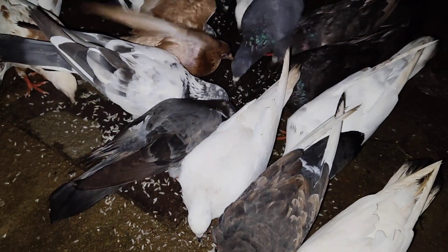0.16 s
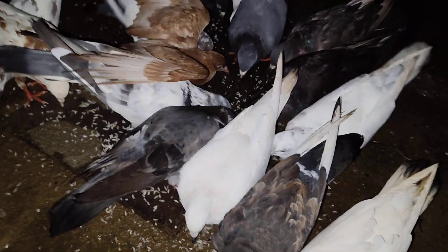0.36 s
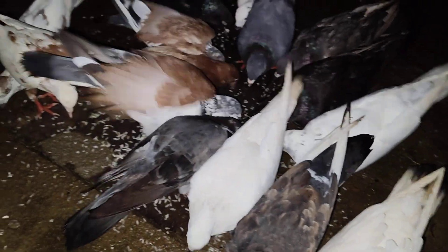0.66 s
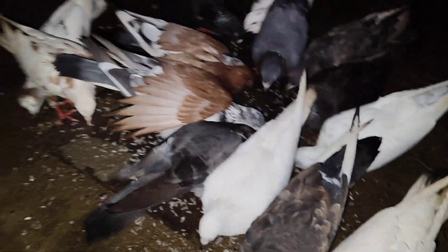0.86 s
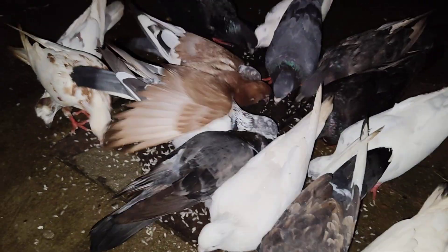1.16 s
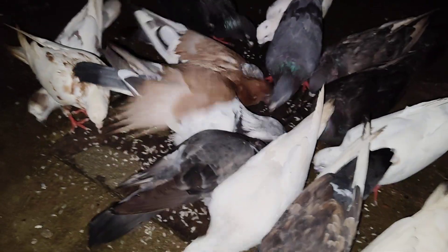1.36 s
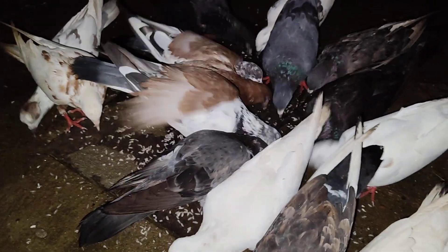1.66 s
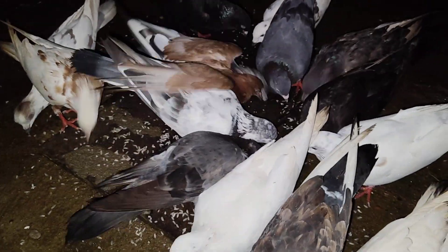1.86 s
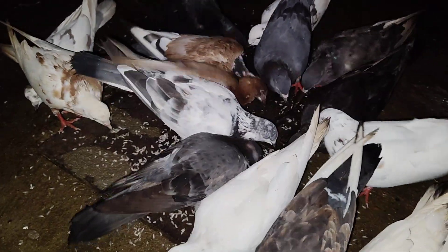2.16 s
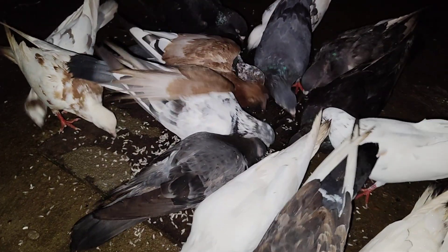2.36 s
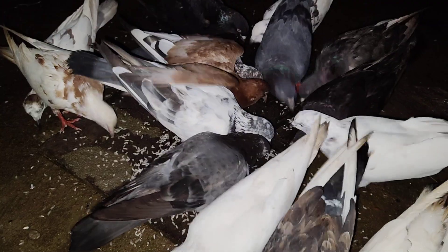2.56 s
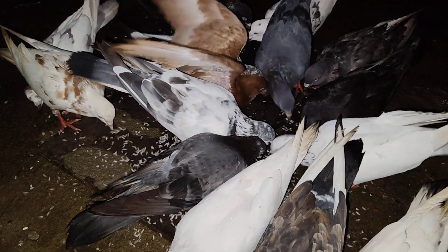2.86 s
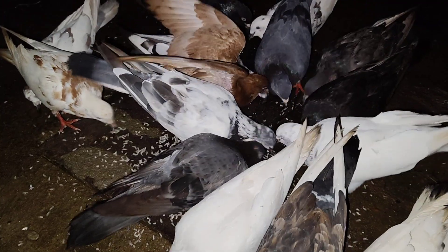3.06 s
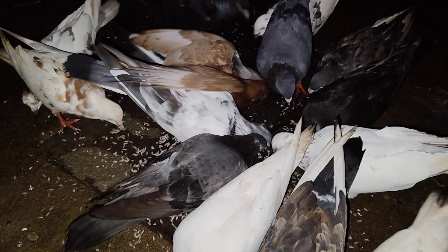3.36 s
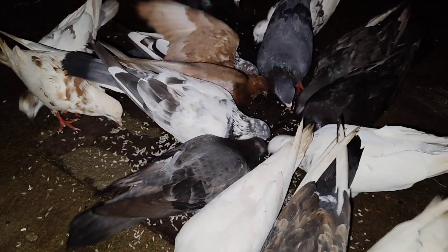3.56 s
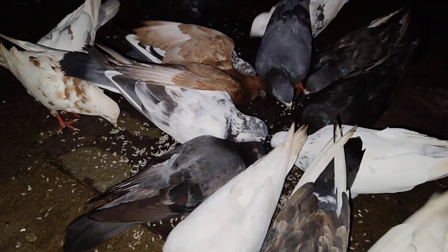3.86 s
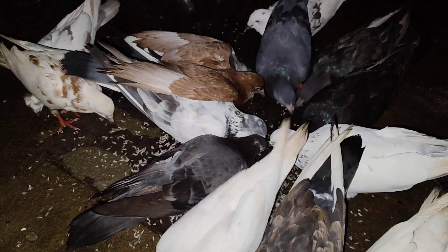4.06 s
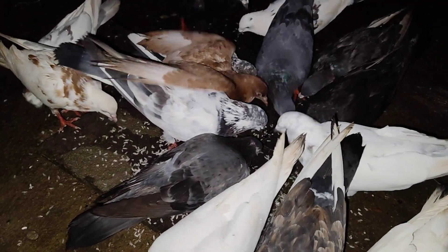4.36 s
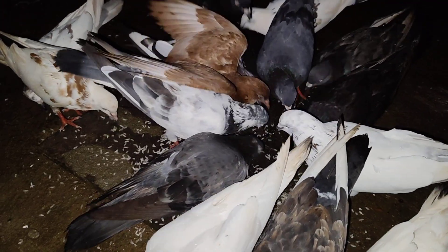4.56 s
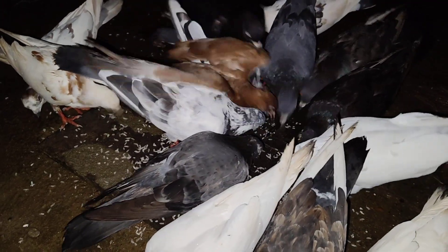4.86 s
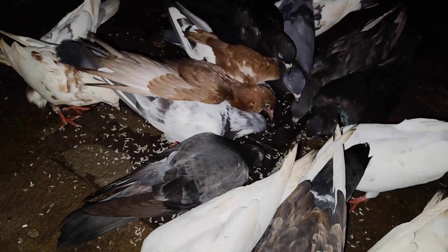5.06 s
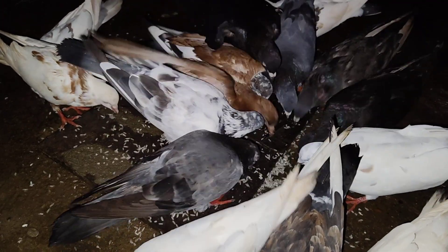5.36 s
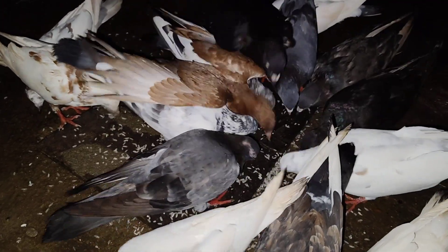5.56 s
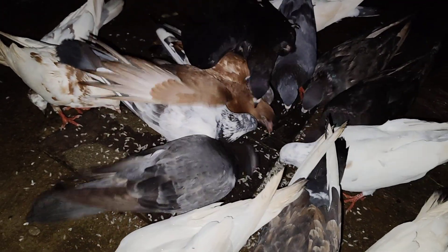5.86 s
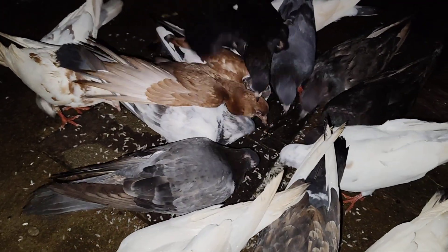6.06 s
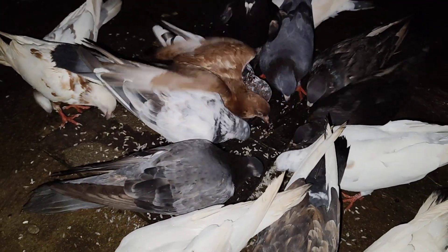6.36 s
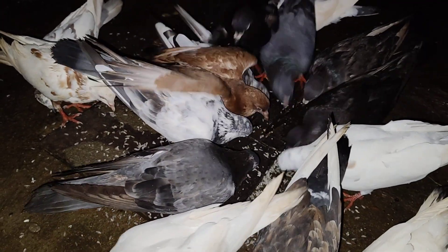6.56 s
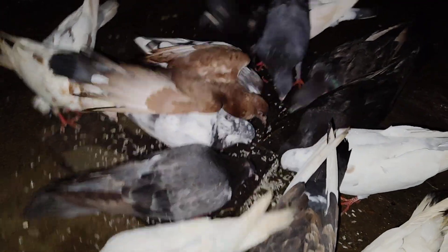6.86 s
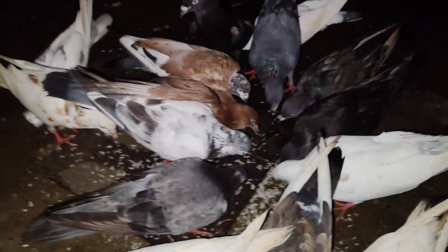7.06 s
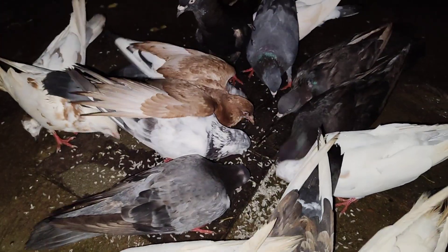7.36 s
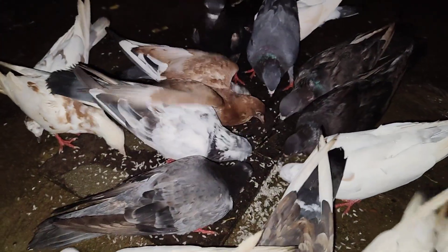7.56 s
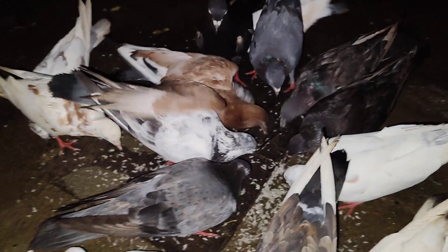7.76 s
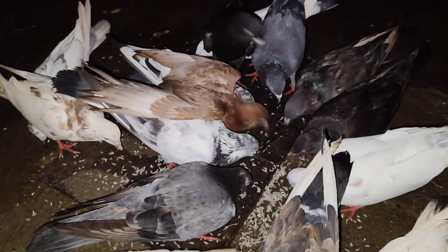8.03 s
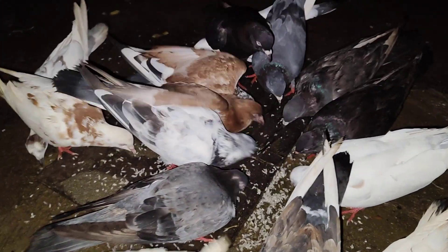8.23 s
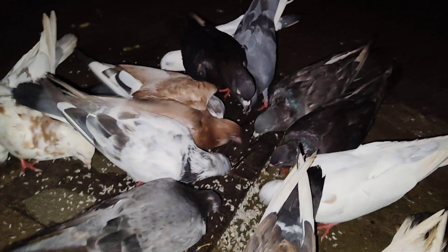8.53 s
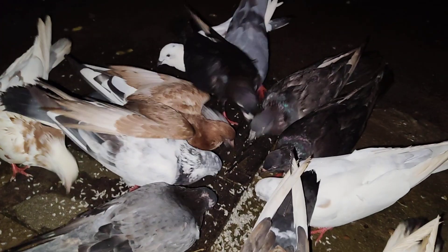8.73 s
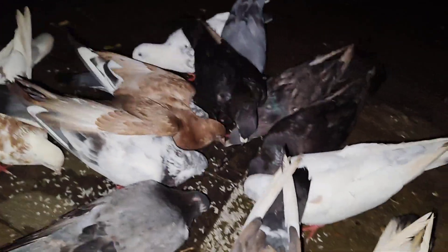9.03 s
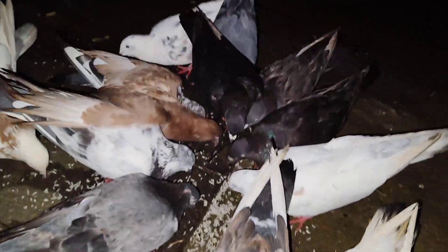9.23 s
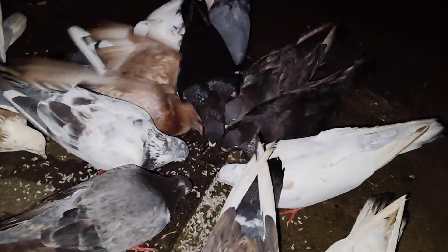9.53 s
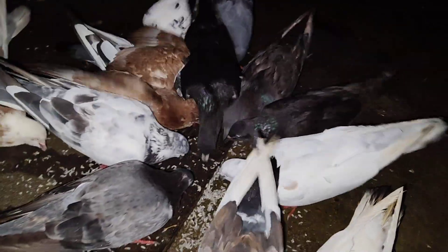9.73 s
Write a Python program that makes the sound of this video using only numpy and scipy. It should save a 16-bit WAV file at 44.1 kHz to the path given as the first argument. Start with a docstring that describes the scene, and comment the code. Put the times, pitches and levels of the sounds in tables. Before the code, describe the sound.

Pigeons peck grain from a hard floor close by, making small, irregular, hollow taps throughout, mixed with light husk ticks and feather rustles. A quiet, steady hum of night insects lies behind them, and one faint cricket trills about once a second. From about 0.4 seconds, soft wing beats push low puffs of air onto the left side of the microphone, strongest around 1 to 1.7 seconds and again from 6 to 7 seconds. From 0.6 seconds a young bird begs in thin, high, wavering whistles, often two pitches at once, with faint hoarse wheezes. The begging peaks near 3 seconds in a squeal with hissy edges, then returns in short calls roughly every second from 4 to 8 seconds. The hardest peck lands near 6.9 seconds, and the tapping continues until the end, at about 10 seconds.

```python
"""Pigeons crowd over grain at night. From the start, beaks knock on the floor in short ringing blows, and a
near wall's quick echo lends them a few evenly spaced pitches; husks tick and feathers brush, in front of the
steady noise bands of an insect chorus. From 0.4 s wing beats puff air on the left microphone port. From 0.6 s a
young bird begs in thin two-voiced whistles and hoarse wheezes, and one cricket trills about every 0.9 s. The
begging peaks near 3 s in a squeal with hissy edges; the hardest peck falls near 6.9 s, and the feeding goes on
to the end."""
import sys
import numpy as np
from scipy import signal
from scipy.fft import rfft, irfft
from scipy.io import wavfile

SR = 44100
rng = np.random.default_rng(int(sys.argv[2]) if len(sys.argv) > 2 else 0)


def log_audio(samples):
    """Write samples as a 16-bit WAV file to the path given in sys.argv[1]."""
    # one column per channel
    frames = np.atleast_2d(samples).T
    # limit to full scale, then quantise
    limited = np.clip(frames, -1, 1)
    pcm = np.round(limited * 32767).astype(np.int16)
    wavfile.write(sys.argv[1], SR, pcm)


N = 436149


def from_db(db):
    """Amplitude ratio of a level in decibels."""
    return 10 ** (np.asarray(db) / 20)


def rms_one(x):
    """Normalisation to unit rms."""
    return x / np.sqrt(np.mean(x ** 2) + 1e-20)


def peak_one(x):
    """Normalisation to unit peak."""
    return x / np.abs(x).max()


def at_hz(points, hz):
    """Interpolation of (frequency, value) points on a logarithmic frequency axis."""
    point_hz, values = np.transpose(points)
    return np.interp(np.log(hz), np.log(point_hz), values)


def stretch(rows):
    """Linear interpolation of timed rows: first sample, tapered window, each column sample by sample."""
    times, *columns = np.transpose(rows)
    at = np.arange(round(times[0] * SR), min(round(times[-1] * SR), N))
    window = signal.windows.tukey(len(at), min(1, 0.014 * SR / len(at)))
    return at[0], window, [np.interp(at / SR, times, column) for column in columns]


def drift(corner_hz):
    """Random modulation of unit rms: noise through a double one-pole low-pass."""
    pole = np.exp(-40 * np.pi * corner_hz / SR)      # runs at SR / 20
    slow = signal.lfilter([1], [1, -2 * pole, pole * pole], rng.standard_normal(N // 20 + 2002))[2000:]
    return np.interp(np.arange(N) / 20, np.arange(len(slow)), rms_one(slow))


def band(x, low_hz, high_hz, order=3):
    """Maximally flat band-pass filter."""
    return signal.sosfilt(signal.butter(order, [low_hz, high_hz], "band", fs=SR, output="sos"), x)


def add(out, start, sound, pan_db, lag):
    """Direction from level and time differences: pan is left minus right; the right lags in samples."""
    for side, shift in enumerate((0, round(lag))):
        part = sound[:max(0, N - start - shift)]
        out[side, start + shift:start + shift + len(part)] += part * from_db(pan_db * (0.25 - side))


def peck(spot_hz, crunch_db):
    """Ringing impact: a blow sounds most the ringing pitches near the struck spot's pitch; grain crunches."""
    # ringing pitches of a knock: (frequency [Hz], relative level [dB], 60 dB decay time [s])
    ringing_tones = [(583.4, -1.5, 0.064), (760, 2, 0.045), (950, 8, 0.021), (1170, 2.5, 0.016),
                     (1258, 4, 0.014), (2297, 11, 0.014)]
    loss_db_per_octave, contact_s, damping_spread = 12, .0006, .12
    hz, level_db, t60 = np.transpose(ringing_tones)[:, :, None]
    t = np.arange(2300) / SR
    chance = rng.standard_normal(2 * len(hz))
    mode_db = level_db - loss_db_per_octave * np.abs(np.log2(hz / spot_hz))
    mode_db += 3.5 * np.clip(chance[:len(hz), None], -1.5, 1.5)
    detune = 1 + 0.032 * chance[len(hz):, None]
    decay_db = -60 * t / (t60 * np.exp(damping_spread * chance[1]))
    rings = np.sum(from_db(mode_db + decay_db) * np.sin(2 * np.pi * hz * detune * t), axis=0)
    knock = band(rings * (1 - np.exp(-t / contact_s)) ** 2, 480, 2600)      # little bass leaves the floor
    crunch_envelope = from_db(-60 * t / 0.02) * (1 - np.exp(-t / 0.0038))
    crunch = band(rng.standard_normal(len(t)) * crunch_envelope, 830, 2680)
    blow = peak_one(knock) + from_db(crunch_db) * peak_one(crunch)
    # a lighter, brighter second contact as the beak closes and lifts
    lag = round((.024 + .003 * np.clip(chance[0], -2, 2)) * SR)
    second_db = -16 + 5 * np.clip(chance[-1], -2, 1.8)
    blow[lag:] += from_db(second_db) * band(blow, 700, 2600, order=1)[:-lag]
    return blow


def pecks():
    """Superposition of impacts: clear pecks, and faint ones at random from the back of the flock."""
    # beak on floor: (time [s], knock level [dB], pitch of the spot [Hz], crunch re knock [dB])
    blows = [(0.014, -27.5, 1168, -16), (0.062, -44, 580, -9), (0.109, -45.5, 574, -11),
             (0.121, -40.5, 560, -11), (0.145, -33.5, 760, -22), (0.248, -37.5, 950, -16),
             (0.298, -43.5, 746, -15), (0.317, -34.5, 759, -7), (0.436, -43.5, 750, -11),
             (0.534, -42, 581, -11), (0.554, -39.5, 905, -21), (0.577, -39.5, 700, -16),
             (0.636, -61, 555, -11), (0.708, -65, 799, -11), (0.728, -34.5, 736, -10),
             (0.765, -36, 557, -6), (0.834, -43.5, 634, -11), (0.845, -35.5, 780, -7),
             (0.866, -37, 760, -15), (1.072, -42, 565, -11), (1.083, -42.5, 584, -4),
             (1.165, -34.5, 700, -23), (1.23, -48.5, 764, -11), (1.306, -43, 710, -18),
             (1.377, -39, 560, 1.5), (1.444, -45.5, 579, -9), (1.47, -31.5, 990, -14),
             (1.603, -51.5, 573, -9), (1.692, -46.5, 522, -11), (1.693, -57, 781, -11),
             (1.725, -31.5, 568, -16), (1.757, -44, 596, -15), (1.868, -40.5, 958, -16),
             (1.969, -39.5, 579, -6), (2.021, -28.5, 784, -15), (2.129, -45.5, 522, -11),
             (2.147, -31, 950, -17), (2.225, -35.5, 625, -21), (2.358, -63, 926, -11),
             (2.375, -32.5, 630, -20), (2.437, -46, 925, -19), (2.612, -44.5, 834, -15),
             (2.712, -32.5, 770, -22), (2.774, -42, 625, -3), (2.935, -54, 1300, -11),
             (3.015, -40, 950, -16), (3.141, -46.5, 786, -13), (3.327, -31.5, 950, -22),
             (3.423, -42.5, 760, -21), (3.47, -42.5, 720, -16), (3.557, -42.5, 980, -15),
             (3.672, -45.5, 930, -11), (3.725, -47, 748, -19), (3.844, -50.5, 960, -16),
             (4.025, -31.5, 780, -18), (4.069, -60, 977, -11), (4.139, -59, 902, -11),
             (4.156, -35, 700, -6), (4.17, -31.5, 980, -9), (4.527, -43, 1260, -11),
             (4.575, -32.5, 1240, -18), (4.644, -43.5, 1270, -11), (4.82, -39.5, 576, -11),
             (4.841, -31, 730, -14), (4.89, -32.5, 571, -22), (4.893, -34, 571, -6), (4.925, -34.5, 740, 4),
             (5.068, -52, 560, -11), (5.094, -37.5, 760, -17), (5.12, -40, 783, -6),
             (5.133, -34.5, 736, -9), (5.263, -47, 600, -11), (5.301, -40, 920, -9), (5.354, -51, 765, -11),
             (5.379, -35.5, 780, -6), (5.412, -26.5, 770, -12), (5.561, -38, 600, 3), (5.607, -42, 573, -6),
             (5.659, -50, 950, -13), (5.682, -44, 780, -8), (5.873, -33.5, 840, -0.5),
             (6.01, -37.5, 770, -16), (6.119, -43.5, 953, -13), (6.164, -39.5, 770, -25),
             (6.256, -38, 950, -20), (6.321, -66, 732, -11), (6.339, -41.5, 960, -11),
             (6.464, -45, 950, -9), (6.595, -37.5, 950, -7), (6.662, -54, 770, -11),
             (6.684, -31.5, 685, -0.5), (6.72, -47, 770, -11), (6.794, -41.5, 947, -2),
             (6.82, -31.5, 759, -9), (6.857, -40, 810, -11), (6.862, -16.5, 1170, -2.5),
             (6.976, -60, 760, -11), (7.015, -40, 754, -8), (7.042, -35.5, 780, -4), (7.119, -47, 760, -9),
             (7.171, -39, 750, -11), (7.444, -46, 970, -9), (7.555, -40, 565, -15), (7.591, -34, 910, -19),
             (7.667, -50, 726, -11), (7.802, -35, 760, -13), (7.874, -32.5, 950, -11),
             (7.946, -47.5, 710, -11), (7.962, -45, 748, -11), (8.031, -36.5, 939, -24),
             (8.158, -52, 571, -7), (8.221, -36.5, 730, -4), (8.393, -40.5, 810, -11),
             (8.478, -32.5, 970, -9), (8.527, -49, 720, -13), (8.541, -39, 580, -10),
             (8.585, -39.5, 794, -16), (8.615, -49, 785, -11), (8.642, -40, 1010, -15),
             (8.722, -47, 815, 3), (8.833, -53, 756, -13), (8.872, -46, 579, -17), (8.954, -37, 690, -6),
             (8.997, -35, 810, -7), (9.016, -32, 806, -17), (9.183, -44.5, 950, 1), (9.289, -35, 576, -6),
             (9.364, -31.5, 925, -12), (9.378, -30, 586, -4.5), (9.427, -33.5, 930, -2),
             (9.499, -61, 514, -11), (9.516, -43.5, 576, -8), (9.637, -39, 560, -11),
             (9.695, -47, 750, -11), (9.867, -44, 920, -11)]
    faintest_db, faint_range_db = -60.5, 16
    out = np.zeros((2, N))
    for s, level_db, spot_hz, crunch_db in blows:
        sound = from_db(level_db) * peck(spot_hz, crunch_db)
        add(out, round(s * SR), sound, pan_db=1.3 + 5.5 * rng.standard_normal(), lag=5.52)
    for when, size, spot, side in rng.random((100, 4)):
        sound = from_db(faintest_db + faint_range_db * size) * peck(550 + 600 * spot, crunch_db=-27.5)
        add(out, int(when * N), sound, pan_db=6 * (side - .5), lag=4.4)
    return out


def bright_bursts():
    """Exponentially decaying noise in three bands: husk ticks, feather brushes, a squeal's hissy edges."""
    # husks and feathers, except the four rows from 2.8 to 3.1 s: high, hissy edges of the loudest squeal
    # (time [s], narrow band's level [dB], its centre [Hz], 60 dB decay time [s],
    # low band re narrow [dB], wide band re narrow [dB])
    events = [(0.0124, -49.5, 8200, 0.037, 3.5, -15), (0.0603, -54.5, 8150, 0.044, 10, -13),
              (0.196, -55, 8470, 0.03, -10, -15), (0.3745, -56, 8100, 0.083, 13.5, -21),
              (0.5103, -59, 9950, 0.052, 3, -13), (0.6963, -57, 9710, 0.044, 6, -15),
              (0.915, -51, 8300, 0.037, -20, -12), (1.0754, -52.5, 8300, 0.029, -16, -15),
              (1.36, -56, 7960, 0.061, 4, -13), (1.375, -49, 7670, 0.071, 2, -10),
              (1.4267, -54, 7960, 0.1, -13, -1), (1.598, -52, 8000, 0.044, 0, -9),
              (1.679, -58, 10900, 0.041, -1, -11), (1.984, -52, 8400, 0.041, 3, -5),
              (2.6366, -46, 7920, 0.031, -25, -26), (2.8684, -71, 8400, 0.055, -7, -15),
              (2.9243, -54, 7700, 0.061, -12, -24), (2.9756, -72, 7750, 0.055, 5, -15),
              (3.042, -54, 8500, 0.071, -5, -8), (3.779, -56, 10100, 0.05, -14, -13),
              (4.0685, -39.5, 8200, 0.089, -3, -3.5), (4.1614, -51.5, 8900, 0.085, -7, -15),
              (4.3853, -66, 8060, 0.055, 4, -15), (4.656, -65, 8080, 0.035, 6, -17),
              (5.412, -47, 7800, 0.026, 12, -18), (5.5593, -51, 7770, 0.033, 18, -15),
              (5.7618, -49.5, 7900, 0.055, -6, -7), (5.7957, -58, 10700, 0.055, -10, -15),
              (6.062, -48, 8100, 0.034, -17, -16), (6.567, -59, 8130, 0.04, -10, -15),
              (6.5994, -55.5, 9200, 0.043, -19, -15), (6.6807, -49.5, 7890, 0.032, 13, -20),
              (6.768, -63, 8430, 0.046, 3, -15), (6.8438, -51, 8300, 0.055, 11, -19),
              (6.8613, -46.5, 8100, 0.031, 15, -17), (7.015, -49, 11050, 0.048, 2, -8),
              (7.0415, -55, 8550, 0.042, -2, -11), (7.2105, -57, 8300, 0.055, -2, -9),
              (7.3178, -64, 8040, 0.055, -15, -15), (7.4245, -67, 8390, 0.051, -15, -15),
              (7.7992, -54.5, 7700, 0.037, 5, -13), (8.0307, -50, 7800, 0.05, -3, -23),
              (8.0472, -50, 7700, 0.044, -12, -25), (8.2257, -62, 8210, 0.047, -10, -17),
              (8.4105, -56.5, 9700, 0.055, -16, -8), (8.7146, -49.5, 8000, 0.03, -5, -11),
              (8.8104, -50.5, 7900, 0.091, -17, -15), (8.8308, -38, 8400, 0.065, -9, -8),
              (8.952, -58, 8110, 0.068, 7, -13), (9.0084, -58, 8300, 0.06, 7, -15),
              (9.051, -54, 7850, 0.049, -8, -15), (9.196, -59, 8000, 0.055, 0, -20),
              (9.2603, -44.5, 8060, 0.061, -21, -21), (9.2738, -44, 8300, 0.029, -28, -19),
              (9.5105, -54.5, 7960, 0.044, 1, -13)]
    out, t = np.zeros((2, N)), np.arange(3600) / SR
    for s, level_db, hz, t60, low_db, wide_db in events:
        rise = (1 - np.exp(-t / (0.077 * t60))) ** 2      # long bursts also start slowly
        bursts = rng.standard_normal((3, len(t))) * from_db(-60 * t / t60) * rise
        narrow = peak_one(band(bursts[0], 0.967 * hz, 1.047 * hz))
        wide = peak_one(band(bursts[1], 8600, 12100, order=2))
        low = peak_one(band(bursts[2], 3000, 5020))
        add(out, round(s * SR), from_db(level_db) * narrow, pan_db=14, lag=4)
        add(out, round(s * SR), from_db(level_db + wide_db) * wide, pan_db=2, lag=4)
        add(out, round(s * SR), from_db(level_db + low_db) * low, pan_db=-7, lag=5.32)
    return out


def whistles():
    """Frequency and amplitude modulation: each begging voice is a wavering sine with a weaker octave."""
    # whistles, one row for each stretch of a voice; the loudest call runs over several rows: (pan [dB],
    # left lag [ms], octave re fundamental [dB], contour of (time [s], pitch [Hz], rms level [dB]))
    stretches = [ (5, 0.29, -27, [(0.63, 3560, -75), (0.64, 3414, -72), (0.732, 3829, -63),
                 (0.798, 3650, -61), (0.874, 3600, -61), (0.88, 3670, -61), (0.91, 3500, -73)]),
                 (-8, 0.21, -32, [(0.63, 4070, -88), (0.638, 3880, -78), (0.682, 4200, -58),
                 (0.744, 4200, -84), (0.78, 3770, -73)]), (-12, 0.19, -33, [(2.45, 4142, -95),
                 (2.48, 4080, -62), (2.55, 4450, -88), (2.562, 4050, -78), (2.57, 4007, -91)]),
                 (-7, 0.21, -32, [(2.56, 4080, -86), (2.578, 4000, -66), (2.646, 4040, -54),
                 (2.662, 4180, -60.5), (2.77, 3500, -51), (2.79, 3495, -80)]),
                 (-3.5, 0.22, -23, [(2.915, 3700, -102), (2.935, 3969, -51), (2.951, 3674, -47.5),
                 (3.0, 3970, -49), (3.01, 3900, -45), (3.016, 3850, -50), (3.048, 4186, -33),
                 (3.1, 3970, -62)]), (-4, 0.218, -10, [(3.1, 3780, -58), (3.116, 3567, -71),
                 (3.134, 3960, -53), (3.16, 3850, -48), (3.17, 3850, -50), (3.2, 4030, -44.5),
                 (3.218, 3740, -59), (3.225, 3666, -69)]), (26, 0.18, -36, [(2.855, 8530, -79),
                 (2.883, 8270, -61.5), (2.913, 7000, -91), (2.95, 5650, -70)]),
                 (1, 0.13, -28, [(2.94, 5720, -57), (2.974, 5770, -53), (2.998, 5730, -60),
                 (3.032, 5300, -52), (3.05, 4960, -39)]), (-4.5, 0.13, -12.5, [(3.04, 5240, -68),
                 (3.058, 4940, -44), (3.094, 4934, -44), (3.13, 5150, -45), (3.14, 4990, -42),
                 (3.2, 4950, -40.5), (3.216, 4400, -81), (3.225, 4470, -65)]),
                 (3, 0.22, -35, [(4.09, 3290, -70), (4.102, 3680, -59), (4.2, 3810, -57.5),
                 (4.208, 3770, -58.5), (4.362, 3920, -51), (4.378, 3860, -56), (4.386, 3860, -51.5),
                 (4.44, 3250, -64)]), (3, 0.22, -23, [(4.97, 3550, -51), (5.076, 3820, -70),
                 (5.112, 3760, -56), (5.134, 3800, -56), (5.24, 3910, -55.5), (5.268, 3560, -52.5),
                 (5.288, 3580, -55), (5.31, 3510, -51)]), (-12, 0.24, -42, [(4.98, 3980, -107),
                 (4.998, 4130, -59), (5.098, 4030, -59), (5.204, 4240, -70), (5.236, 4100, -74),
                 (5.25, 4219, -79), (5.3, 4100, -63)]), (-8, 0.26, -34, [(5.83, 3460, -60),
                 (5.904, 3955, -58.5), (5.958, 4000, -62), (6.006, 4050, -47), (6.03, 4085, -44.5),
                 (6.065, 4370, -71), (6.084, 4110, -45), (6.182, 4000, -44), (6.208, 3580, -57),
                 (6.24, 3550, -51)]), (-9.5, 0.217, -34, [(6.89, 3706, -78), (6.922, 3904, -60),
                 (6.986, 4040, -62.5), (7.018, 3915, -51), (7.118, 4140, -47.5), (7.132, 3950, -46),
                 (7.16, 3660, -55.5), (7.2, 3210, -59)]), (-27, 0.14, -34, [(7.03, 4540, -88),
                 (7.044, 4530, -72), (7.166, 4600, -79), (7.178, 4513, -80), (7.19, 4669, -88)]),
                 (3, .22, -26, [(7.73, 3306, -71), (7.768, 3390, -57), (7.856, 3707, -54),
                 (7.916, 3674, -52), (7.95, 3860, -53), (7.958, 3776, -52), (8.05, 3910, -49),
                 (8.12, 3490, -52)]), (-9, 0.2, -40, [(7.76, 3870, -76), (7.78, 3940, -56),
                 (7.928, 3943, -62), (7.99, 3970, -50.5), (8.016, 3980, -61), (8.036, 4110, -52),
                 (8.092, 4100, -59), (8.12, 4023, -84)]), (-16, 0.23, -40, [(8.96, 4130, -86),
                 (8.976, 4394, -94), (9.174, 5060, -77), (9.23, 5016, -80.5), (9.27, 5290, -70),
                 (9.386, 5260, -80), (9.42, 5330, -101)]), ]
    waver_depth, flutter_db, rasp_depth = .006, 1.6, .1
    out = np.zeros((2, N))
    waver, flutter, rasp = drift(45), drift(70), drift(350)
    for pan_db, lag_ms, octave_db, contour in stretches:
        start, window, (hz, level_db) = stretch(contour)
        here = slice(start, start + len(window))
        cycles = np.cumsum(hz * (1 + waver_depth * waver[here])) / SR
        phase = 2 * np.pi * (cycles - hz * lag_ms / 1000 * np.array([[1], [0]]))
        tone = (np.sin(phase) + from_db(octave_db) * np.sin(2 * phase)) * (1 + rasp_depth * rasp[here])
        gain = from_db(level_db + flutter_db * flutter[here] + pan_db * np.array([[.5], [-.5]]))
        out[:, here] += np.sqrt(2) * window * gain * tone
    return out


def wheezes():
    """Narrow-band noise: the bird's hiss, centred on its throat resonance, swells fast, fades slowly."""
    # hoarse breaths: (time [s], duration [s], level [dB], throat resonance [Hz])
    breaths = [(0.718, 0.18, -73, 4170), (1.29, 0.34, -69, 4430), (3.044, 0.043, -50, 5000),
               (3.8, 0.35, -83, 4430), (6.238, 0.24, -76, 4360), (8.42, 0.27, -75, 4460)]
    rise_share, edge_db = 0.29, -11.5
    out, roughness = np.zeros((2, N)), drift(260)
    for s, length, level_db, hz in breaths:
        swell = [(s, edge_db), (s + length * rise_share, 0), (s + length, edge_db)]
        start, window, (swell_db,) = stretch(swell)
        carrier = np.sin(2 * np.pi * hz * np.arange(len(window)) / SR)
        hiss = band(window * roughness[start:start + len(window)] * carrier, 2710, 5900)
        add(out, start, from_db(level_db + swell_db) * hiss, pan_db=-27.5, lag=6.7)
    return out


def puffs():
    """Wind noise: turbulence and single pressure swings push the membrane, mostly at the left port."""
    # gusts of stirred air: (centre time [s], level [dB], bell half width [s])
    gusts = [(0.548, -41, 0.054), (0.76, -69, 0.24), (0.97, -28, 0.024), (1.2, -52, 0.36),
             (1.457, -27, 0.034), (1.676, -27, 0.063), (2.022, -40.5, 0.054), (2.181, -40.5, 0.012),
             (2.306, -46, 0.046), (3.762, -42, 0.023), (4.93, -66, 0.075), (5.212, -52, .025),
             (5.356, -64, .015), (5.547, -52, 0.064), (5.73, -42, 0.02), (5.84, -54, 0.018),
             (6.041, -28, 0.043), (6.19, -30.5, 0.024), (6.29, -39.5, .07), (6.573, -34, 0.044),
             (6.712, -39, 0.029), (6.938, -36, 0.066), (7.118, -38.5, 0.058), (7.33, -48, 0.086),
             (7.491, -40, 0.02), (8.01, -38.5, 0.048), (8.7, -50, 0.017), (8.92, -51, 0.02)]
    # puffs that push the membrane once in and out: (time [s], level [dB], frequency [Hz])
    pushes = [(0.485, -32, 42.8), (0.756, -43.5, 70.6), (0.951, -33, 49.5), (1.194, -49, 40.4),
              (1.428, -26, 65.3), (1.595, -33, 67.7), (1.701, -21.5, 77), (1.976, -44, 75),
              (2.264, -47.5, 59.5), (3.716, -38.5, 39), (5.183, -53, 43.1), (5.994, -33, 59.6),
              (6.072, -24, 62.5), (6.16, -23.5, 69), (6.502, -42, 74.4), (6.874, -42, 56.5),
              (6.923, -28.5, 53), (7.371, -43, 54.3), (7.992, -39, 40.6), (8.667, -55, 40)]
    calm_db, right_port_db = -70.5, -44.5
    t = np.arange(N) / SR
    swells = sum(from_db(level_db) * np.exp(-.5 * ((t - s) / half) ** 2) for s, level_db, half in gusts)
    turbulence = rms_one(band(rng.standard_normal((2, N + SR)), 24.1, 61.8)[:, SR:])
    port_db = 2 * drift(14) + np.array([[0], [right_port_db]])
    out = turbulence * (from_db(calm_db) + swells) * from_db(port_db)
    for s, level_db, hz in pushes:
        cycles = (np.arange(3000) / SR - .022) * hz
        swing = -np.sin(2 * np.pi * cycles) * np.exp(-(cycles / 0.4) ** 2)
        add(out, round((s - .008) * SR), from_db(level_db) * swing, pan_db=30.5, lag=0)
    return out


def flaps():
    """Air displacement: each wing beat is a dull, exponentially decaying burst of low noise."""
    # wing beats: (time [s], level [dB], 60 dB decay time [s], pan [dB])
    beats = [(0.421, -62, 0.047, -19), (0.497, -60, 0.59, -6), (0.645, -48, 0.015, -16.5),
             (0.739, -56, 0.058, -10), (1.303, -54, 0.084, 3), (1.478, -50, 0.046, 4),
             (1.709, -55, 0.12, 28), (3.843, -55, 0.019, 2), (5.126, -57.5, 0.052, -6),
             (5.761, -51, 0.097, 2.5), (6.854, -46, 0.031, -4), (7.033, -45, 0.046, -23.5),
             (7.081, -59.5, 0.089, -22.5), (7.817, -58.5, 0.092, -4), (7.988, -66, 0.05, -24),
             (8.45, -62, 0.31, -14), (8.531, -50.5, 0.11, -15), (8.618, -58, 0.049, -12),
             (9.399, -58.5, 0.23, -10), (9.461, -49, 0.11, 2)]
    out, t = np.zeros((2, N)), np.arange(6000) / SR
    for s, level_db, t60, pan_db in beats:
        envelope = from_db(-60 * t / max(t60, .02)) * (1 - np.exp(-t / 0.0031)) ** 2
        burst = band(rng.standard_normal(len(t)) * envelope, 55, 306)
        add(out, round(s * SR), from_db(level_db) * peak_one(burst), pan_db, lag=3)
    return out


def crackle():
    """A clustered random process: scattering grain and rustling feathers make narrow-band scratches."""
    # scratch bands: (centre [Hz], pan [dB])
    bands = [(4700, -11.5), (7900, 27), (8500, 19), (9800, 14.5), (11200, -4)]
    out = np.zeros((2, N))
    onsets = rng.random(N) < 70 * from_db(7 * drift(4)) / SR      # the rate wanders around 70 a second
    sizes = from_db(3 * np.minimum(rng.exponential(1, N), 3))
    band_index = rng.integers(0, len(bands), N)
    noise = rng.standard_normal(N)
    for k, (hz, pan_db) in enumerate(bands):
        envelope = signal.fftconvolve(sizes * onsets * (band_index == k), np.hanning(1200))[:N]
        add(out, 0, from_db(-71) * band(noise * envelope, 0.907 * hz, 1.057 * hz), pan_db, lag=5.9)
    return out


def cricket():
    """Stridulation: each trill is a few evenly spaced pulses of one tone."""
    # trills: (time [s], pulses [count], level [dB])
    trills = [(.62, 7, -67), (1.488, 11, -60.5), (2.428, 7, -61.5), (3.344, 9, -62), (4.248, 8, -63.5),
              (5.092, 10, -59.5), (5.989, 7, -62), (6.91, 7, -67), (7.875, 5, -66.5), (8.767, 7, -64),
              (9.71, 4, -69)]
    tone_hz, period_s, pulse_s = 7050, .0403, .018
    out, t = np.zeros((2, N)), np.arange(round(pulse_s * SR)) / SR
    pulse = np.hanning(len(t)) * np.sin(2 * np.pi * tone_hz * t)
    for s, count, level_db in trills:
        for k in range(int(count)):
            swell_db = -6 * np.exp(-k / 0.5)      # the first strokes are weaker
            start = round((s + k * period_s - pulse_s / 2) * SR)
            add(out, start, from_db(level_db + swell_db) * pulse, pan_db=-3, lag=1)
    return out


def night():
    """Incoherent summation: far insects merge into bell-shaped noise bands above the low night air."""
    # spectrum of the night air: (frequency [Hz], relative spectral level [dB])
    air = [(18, -1.5), (35, -9.5), (150, -13.5), (400, -19.5), (570, -18.5), (950, -15.5), (1150, -33),
           (1600, -48)]
    # bands of insects and hiss: (centre [Hz], half width [Hz], left and right relative level [dB])
    chorus = [(1618, 205, -4.5, 3), (2148, 154, -77, -0.5), (2970, 15, -2, -3), (3316, 320, -8.5, -1),
              (5070, 780, -42, -28), (6834, 385, -17.5, -15.5), (8100, 390, -20, -63),
              (9150, 550, -35, -39), (10150, 600, -36, -38), (11100, 420, -35, -35),
              (13400, 1800, -57, -45), (15460, 1100, -35, -44)]
    # likeness of the two ports: (frequency [Hz], coherence [0 to 1])
    likeness = [(60, 0.64), (300, 0.83), (900, 0.13), (1400, 1), (7000, 0.59), (9000, .1)]
    rms_db, swell_db, left_lead_rad = -54.5, 3, 1.58
    hz = np.maximum(np.fft.rfftfreq(N, 1 / SR), 1)
    power = from_db(2 * at_hz(air, hz)) * np.ones((2, 1))
    for centre_hz, half_hz, left_db, right_db in chorus:
        skirt_db = -5.97 * ((hz - centre_hz) / half_hz) ** 2
        power += from_db(2 * (np.array([[left_db], [right_db]]) + skirt_db))
    mid, side = rfft(rng.standard_normal((2, N)))
    coherence = at_hz(likeness, hz)
    pair = np.sqrt(1 + coherence) * mid + np.sqrt(1 - coherence) * side * np.array([[1], [-1]])
    pair *= np.sqrt(power)
    pair[0, hz > 1200] *= np.exp(1j * left_lead_rad)
    comb = np.cos(np.pi * 3 * np.log2(hz)) ** 2      # two interleaved sets of bands swell independently
    hum = sum(irfft(pair * share, N) * from_db(swell_db * drift(6.8)) for share in (comb, 1 - comb))
    return from_db(rms_db) * rms_one(hum)


def yard(x):
    """Early reflections: nearby walls add dull echoes that favour each side in turn."""
    # wall echoes: (delay [s], level [dB])
    walls = [(.0052, -12.5), (.0075, -22), (.0113, -16.5), (.0159, -21.5), (.0235, -63), (.0262, -44),
             (.043, -41), (.046, -31)]
    out, dull = x.copy(), band(x, 330, 8700, order=1)
    for k, (delay_s, echo_db) in enumerate(walls):
        lag = round(delay_s * SR)
        out[:, lag:] += from_db(echo_db + np.array([[2.5], [-2.5]]) * (-1) ** k) * dull[:, :-lag]
    return out


def scene():
    """Superposition of the flock with its echoes, the air on the port and the insects behind."""
    flock = pecks() + bright_bursts() + crackle() + whistles() + wheezes() + flaps()
    return yard(flock) + puffs() + cricket() + night()


def record(dry):
    """Band limiting: an elliptic low-pass cuts the top treble steeply."""
    cutoff_hz = 15750
    return signal.sosfilt(signal.ellip(12, .3, 80, cutoff_hz, fs=SR, output="sos"), dry)


dry = scene()
out = record(dry)
log_audio(out)
```